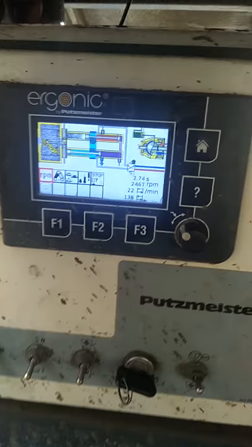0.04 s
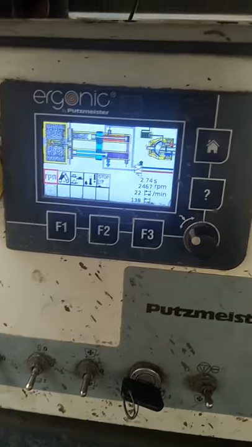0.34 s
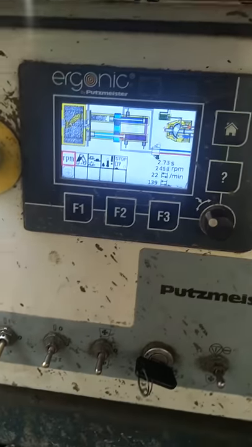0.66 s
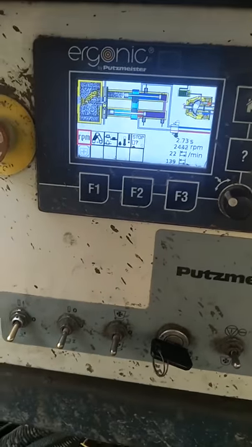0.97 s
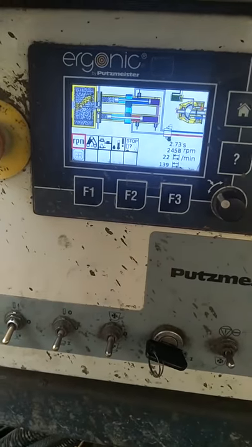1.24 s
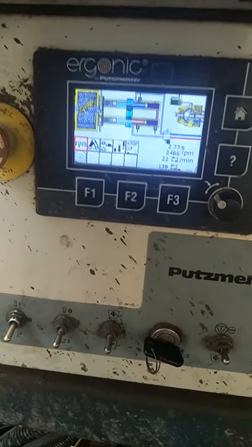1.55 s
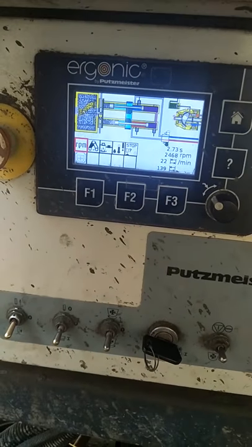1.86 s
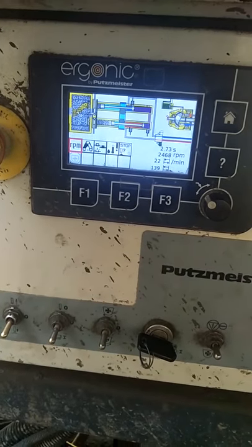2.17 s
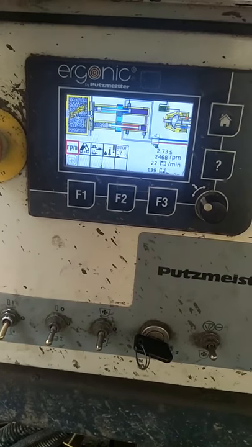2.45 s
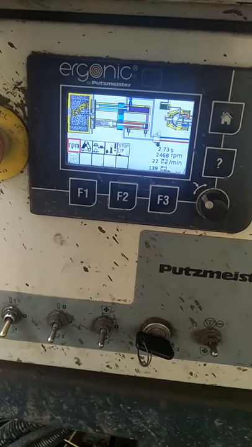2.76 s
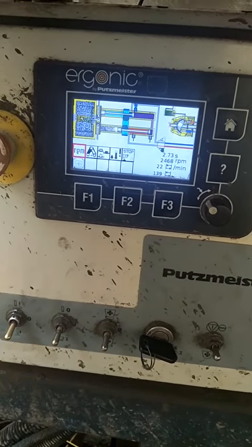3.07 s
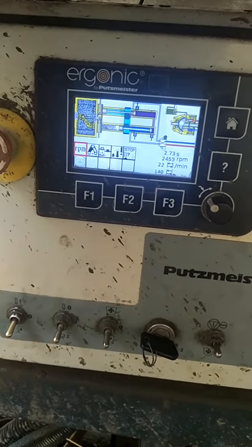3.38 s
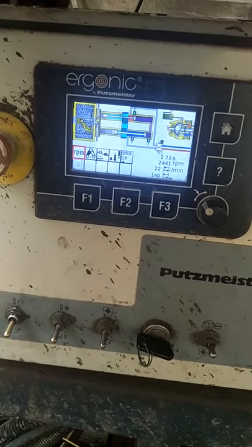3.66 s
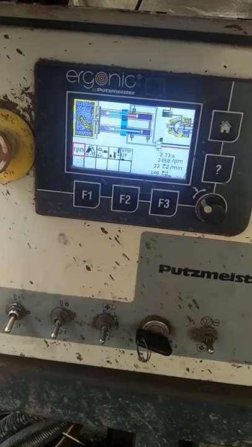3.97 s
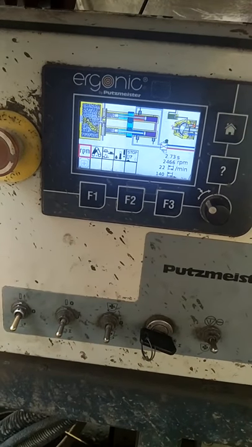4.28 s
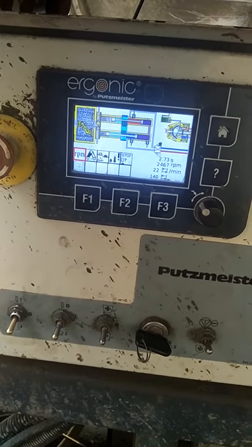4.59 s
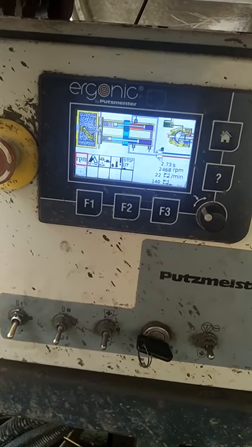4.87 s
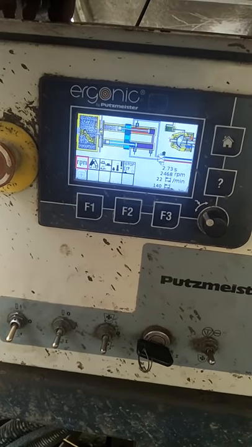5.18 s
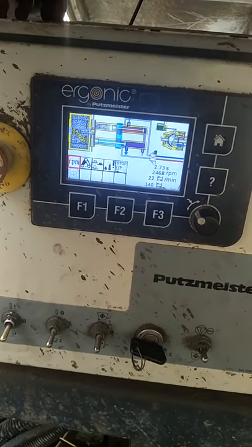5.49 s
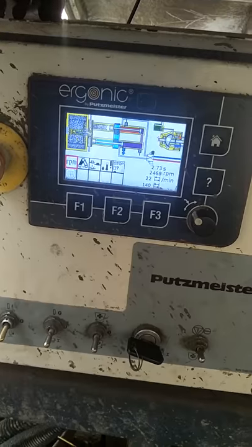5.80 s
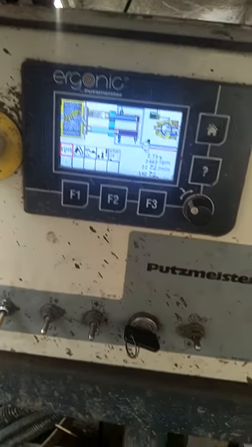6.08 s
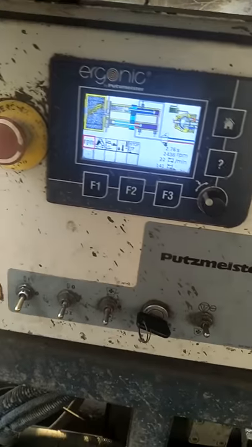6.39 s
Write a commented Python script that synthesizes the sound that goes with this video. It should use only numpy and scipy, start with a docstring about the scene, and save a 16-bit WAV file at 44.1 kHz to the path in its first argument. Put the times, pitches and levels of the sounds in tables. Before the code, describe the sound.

A diesel concrete pump drones loudly with a hydraulic whine, rumbling at each stroke change and twice slamming its valve.

```python
"""Concrete pump, close up

A diesel engine at 2400 rpm drives a nine-piston hydraulic pump and a belt-driven fan. Every 2.7 s the
stroke changes over: the pump whine drops out, the engine sags and recovers, concrete rumbles in the
pipe and oil squirts. The sound fades in during the first changeover. At the next two the valve slams
and the frame knocks, and a gain control ducks after the blows."""
import sys
import numpy as np
from scipy import signal
from scipy.fft import rfft, irfft
from scipy.io import wavfile
from scipy.ndimage import uniform_filter1d, minimum_filter1d

SR = 44100
rng = np.random.default_rng(int(sys.argv[2]) if len(sys.argv) > 2 else 0)


def transcribe(signal):
    """Save signal, clipped to [-1, 1], as a 16-bit WAV file at the path in sys.argv[1]."""
    frames = np.atleast_2d(signal).T
    limited = np.clip(frames, -1, 1)
    pcm = np.round(limited * 32767).astype(np.int16)
    wavfile.write(sys.argv[1], SR, pcm)


N = 292824
TIME_S = np.arange(N) / SR
FREQ_HZ = np.fft.rfftfreq(N, 1 / SR)
CYCLE_HZ = 19.99  # four-stroke cycle, two crank turns


def gain_of(db):
    """Decibels to amplitude."""
    return 10 ** (np.asarray(db) / 20)

def unit_rms(x):
    """Scales to rms 1."""
    return x / np.sqrt(np.mean(x ** 2) + 1e-20)

def spectrum_db(points, hz):
    """Interpolates a spectrum on a log-frequency axis."""
    points_hz, points_db = np.transpose(points)
    return np.interp(np.log(hz + 1), np.log(points_hz), points_db)

def coloured(x, points):
    """Filters x by a spectrum, to rms 1."""
    return unit_rms(irfft(rfft(x) * gain_of(spectrum_db(points, FREQ_HZ)), N))

def wander(rate_hz):
    """Low-passed noise, rms 1."""
    return unit_rms(irfft(rfft(rng.standard_normal(N)) / (1 + (FREQ_HZ / rate_hz) ** 2), N))

def add(mix, start_s, sound):
    """Mixes a sound in, in place."""
    part = mix[round(start_s * SR):][:len(sound)]
    part += sound[:len(part)]

def swell(centre_s, width_s):
    """Gaussian envelope."""
    return np.exp(-((TIME_S - centre_s) / width_s) ** 2)

def tone(cycles, level_db, waver_db):
    """A partial locked to a rotation, wavering in level."""
    amplitude = np.sqrt(2) * gain_of(level_db + waver_db * wander(6.0))
    return amplitude * np.cos(2 * np.pi * (cycles + rng.random()))

def resonance(pitch_hz, width_hz, level_db):
    """A narrow mode, shaken at random."""
    phase = 2 * np.pi * pitch_hz * TIME_S
    return gain_of(level_db) * (wander(width_hz) * np.cos(phase) + wander(width_hz) * np.sin(phase))


# Air noise spectrum: freq_hz, relative_db
AIR_SPECTRUM = [(25, -71), (60, -74), (190, -58), (320, -57), (620, -59), (1000, -56.5), (2100, -56),
                (2900, -62.5), (4800, -68), (6700, -86), (10500, -87.5), (13000, -84), (15000, -92)]

def air_rush(level_db=-21.5, flutter_db=0.5, swell_db=0.07):
    """Cooling air and combustion noise, slightly uneven."""
    strength = gain_of(flutter_db * wander(40) + swell_db * wander(5.5))
    return gain_of(level_db) * coloured(strength * rng.standard_normal(N), AIR_SPECTRUM)


# Fan tones: shaft_harmonic, level_db
FAN_TONES = [(10, -36.5), (11, -37), (12, -41)]

def fan(cycles, turns_per_cycle=3.868):
    """The belt turns the fan out of step with the engine."""
    return sum(tone(round(k) * turns_per_cycle * cycles, db, waver_db=2.5) for k, db in FAN_TONES)


# Stroke changeovers: start_s, length_s, next_cylinder, pressure_db, creep_db_per_s, kick_db,
# rumble_db, squirt_db
CHANGEOVERS = [(0.559, .4, 0, -3, 1.83, 7, -23, -2), (3.29, 0.4, 1, 1.8, -.5, 5, -23, -0.5),
               (6.02, .44, 0, -1.5, 1.5, 10.5, -22, 0)]

def oil_pressure(drop_db=-10.5, drop_s=0.043, return_s=0.065, overshoot_db=1.5, settle_s=0.17):
    """Pressure drops as the valve swings, kicks midway and overshoots; the feed swaps cylinders."""
    load_db, cylinder_mix = np.zeros(N), np.zeros(N)
    for start_s, length_s, cylinder, pressure_db, creep_db_per_s, kick_db, *_ in CHANGEOVERS:
        age_s = TIME_S - start_s
        push_s = np.maximum(age_s - length_s, 0)
        push_db = pressure_db + creep_db_per_s * push_s + overshoot_db * np.exp(-push_s / settle_s)
        swing_db = drop_db + kick_db * swell(start_s + 0.58 * length_s, width_s=0.079)
        load_db += (swing_db - load_db) * np.clip(age_s / drop_s, 0, 1)
        load_db += (push_db - load_db) * np.clip(push_s / return_s, 0, 1)
        cylinder_mix += (round(cylinder) - cylinder_mix) * np.clip(age_s / length_s, 0, 1)
    return load_db, cylinder_mix

def churning(delay_s=0.046, attack_s=0.04, hold_share=0.82, release_s=0.11, rest_db=-46):
    """Envelope of the concrete stirring in the pipe at each changeover."""
    motion = gain_of(rest_db)
    for start_s, length_s, *_, rumble_db, _ in CHANGEOVERS:
        rise = np.clip((TIME_S - start_s - delay_s) / attack_s, 0, 1)
        fall = np.clip(1 - (TIME_S - start_s - hold_share * length_s) / release_s, 0, 1)
        motion = motion + gain_of(rumble_db) * rise * fall
    return motion


# Pipe rumble spectrum: freq_hz, relative_db
RUMBLE_SPECTRUM = [(25, -32), (50, -10), (75, -2), (118, -2), (170, -5), (330, -10), (600, -8),
                   (1100, -11.5), (1800, -9.5), (2600, -10.5), (4000, -33), (8000, -45)]

def concrete_rumble():
    """The mix rumbles in the pipe while the valve swings; hopper and frame ring with it."""
    hopper = resonance(pitch_hz=115.5, width_hz=14, level_db=-7.5)
    frame = resonance(pitch_hz=720, width_hz=11, level_db=-6)
    pipe = coloured(rng.standard_normal(N), RUMBLE_SPECTRUM)
    return churning() * (pipe + hopper + frame)


# Oil valve squirts: changeover_share, level_db, width_s, centre_hz, width_octaves
OIL_VALVES = [(.2, -36, .012, 5300, .25), (.42, -23, 0.017, 1650, .22), (.6, -43.5, 0.084, 4800, 1.0),
              (.74, -44, .03, 12600, .22), (.92, -25, .025, 2400, 0.29)]

def oil_squirts():
    """Oil hisses through the valves in the same order at each changeover, each in its own band."""
    out, noise = np.zeros(N), rfft(rng.standard_normal(N))
    for share, level_db, width_s, centre_hz, width_octaves in OIL_VALVES:
        band = np.exp(-(np.log2((FREQ_HZ + 1) / centre_hz) / width_octaves) ** 2)
        envelope = sum(gain_of(squirt_db) * swell(start_s + share * length_s, width_s)
                       for start_s, length_s, *_, squirt_db in CHANGEOVERS)
        out += gain_of(level_db) * envelope * unit_rms(irfft(noise * band, N))
    return out


def impact_envelope(level_db, t60_s, rise_s=0.001):
    """Quick rise, exponential decay."""
    t = TIME_S[:SR // 2]
    return gain_of(level_db) * (1 - np.exp(-t / rise_s)) * np.exp(-np.log(1000) * t / t60_s)

def struck_mode(pitch_hz, level_db, t60_s):
    """One decaying vibration."""
    return impact_envelope(level_db, t60_s) * np.sin(2 * np.pi * pitch_hz * TIME_S[:SR // 2])


# Knocks: start_s, level_db, hardness_db_per_octave
FRAME_KNOCKS = [(3.374, -16, -3), (3.407, -23.5, -10), (3.584, -24, -7), (6.115, -8, -2),
                (6.307, -6.5, 1.5), (6.318, -12, 3), (6.337, -20, -3)]
# Frame modes: pitch_hz, relative_db, t60_s
FRAME_MODES = [(86.5, -13, 0.22), (133, -2, 0.13), (220, -14, 0.1), (329, -1.5, 0.12), (521, -14.5, 0.11),
               (709, -5, 0.12), (1000, -6, 0.043)]
# Gravel crunch spectrum: freq_hz, relative_db
GRAVEL_SPECTRUM = [(100, -4), (300, 12), (1100, -5), (2500, -24), (6000, -36)]

def knocks(crunch_db=-9, crunch_t60_s=0.086):
    """The new stroke takes up the concrete: gravel crunches, the frame rings, brighter if hit harder."""
    out = np.zeros(N)
    for start_s, level_db, hardness in FRAME_KNOCKS:
        ring = sum(struck_mode(hz, level_db + mode_db + hardness * np.log2(hz / 300), t60_s)
                   for hz, mode_db, t60_s in FRAME_MODES)
        gravel = coloured(rng.standard_normal(N), GRAVEL_SPECTRUM)[:len(ring)]
        crunch = impact_envelope(level_db + crunch_db + 2 * hardness, crunch_t60_s) * gravel
        add(out, start_s, ring + crunch)
    return out


# Valve impacts: start_s, level_db, pitch_hz, t60_s
VALVE_SLAMS = [(3.271, 1.5, 291, 0.088), (3.281, -5.5, 357, .08), (3.294, 2, 276, 0.15),
               (5.998, -4, 330, 0.076), (6.003, -1.5, 280, 0.18), (6.021, -4, 319, 0.17),
               (6.042, -8, 268.8, .1)]
# Pipe modes: pitch_ratio, relative_db
PIPE_MODES = [(1, -2), (1.28, -12), (2.02, -13.5), (3.2, -22)]

def valve_slams():
    """The valve slams over and rings the pipe."""
    out = np.zeros(N)
    for start_s, level_db, pitch_hz, t60_s in VALVE_SLAMS:
        ring = sum(struck_mode(pitch_hz * ratio, level_db + db, t60_s) for ratio, db in PIPE_MODES)
        add(out, start_s, ring)
    return out


# Governor response: changeover_share, offset_hz
SPEED_SAG = [(0, 0), (.25, -.74), (.55, -.41), (.77, -.34), (.99, .26), (1.24, -.05), (1.5, 0)]

def crank(jitter_cycles=0.00038, shudder_cycles=0.019):
    """Engine cycles elapsed; at each changeover the crank shudders, sags and overshoots."""
    offset_hz = sum(np.interp((TIME_S - start_s) / length_s, *np.transpose(SPEED_SAG))
                    for start_s, length_s, *_ in CHANGEOVERS)
    unevenness = (jitter_cycles + shudder_cycles * churning()) * wander(13.5)
    return np.cumsum(CYCLE_HZ + offset_hz) / SR + unevenness


# Engine band edges, the lowest two bands being exhaust: edge_hz
BAND_EDGES_HZ = [0, 150, 550, 1100, 1900, 6000]

def spread_power(lines, hz, bursts):
    """Reshapes one cycle's spectrum: exhaust comes in bursts, block clatter falls evenly all round."""
    cycle = 0
    for low_hz, high_hz in zip(BAND_EDGES_HZ, BAND_EDGES_HZ[1:]):
        band = irfft(lines * (hz >= low_hz) * (hz < high_hz))
        power = uniform_filter1d(band ** 2, len(band) // 8, mode="wrap")
        levelled = band * np.sqrt(power.mean() / power)
        cycle = cycle + levelled * (bursts if high_hz <= BAND_EDGES_HZ[2] else 1)
    return rfft(cycle)


# Exhaust drone: cycle_harmonic, level_db
EXHAUST_LINES = [(2, -51), (3, -38), (4, -43), (5, -48), (6, -40), (7, -41), (8, -41), (9, -36), (10, -32),
                 (11, -29), (12, -39), (13, -34), (14, -35), (15, -35), (16, -36), (17, -39), (19, -36),
                 (20, -38), (21, -51), (22, -31), (23, -49), (24, -37), (25, -47), (26, -36), (27, -37),
                 (28, -39)]
# Strongest engine block lines: cycle_harmonic, level_db
BLOCK_LINES = [(42, -34), (46, -37), (48, -32), (49, -36), (52, -38), (58, -32), (59, -36), (60, -37),
               (62, -36), (63, -32), (65, -35), (66, -30), (69, -33), (73, -31), (75, -36), (76, -37),
               (77, -37), (78, -32), (81, -34), (84, -36), (87, -33), (89, -32), (92, -34), (93, -35),
               (100, -38), (104, -37), (105, -35), (109, -38)]
# Envelope of the other block lines: freq_hz, line_db
CLATTER_SPECTRUM = [(600, -46.5), (850, -41), (1200, -41.5), (1700, -42), (2100, -44.5), (2500, -45.5),
                    (3200, -53), (4500, -69), (5500, -70.5)]

def diesel_engine(cycles, cylinders=3, scatter_db=4.0, burst_floor=0.97, decay_share=0.28, size=8192):
    """One cycle repeats with the crank: low exhaust bursts under the dense clatter of the block."""
    position, harmonic = np.arange(size) / size, np.arange(size // 2 + 1)
    hz = harmonic * CYCLE_HZ
    line_db = spectrum_db(CLATTER_SPECTRUM, hz) + scatter_db * rng.standard_normal(len(hz))
    for k, level_db in [*EXHAUST_LINES, *BLOCK_LINES]:
        line_db[round(k)] = level_db
    sounding = (harmonic > 1) & (harmonic < 300) & (harmonic % 18 > 0)  # every 18th is the pump's
    amplitudes = gain_of(line_db) * sounding
    bursts = burst_floor + np.exp(-(position * cylinders % 1) / decay_share)
    lines = amplitudes * np.exp(2j * np.pi * rng.random(len(hz)))
    for _ in range(12):  # phases settle into the firing pattern
        lines = amplitudes * np.exp(1j * np.angle(spread_power(lines, hz, bursts)))
    return np.interp(cycles, position, irfft(lines) * size / np.sqrt(2), period=1)


# Pump whine: piston_harmonic, first_cylinder_db, second_cylinder_db, waver_db
WHINE_TONES = [(1, -33.5, -33, 0.5), (2, -32, -32, 1.9), (3, -34, -28, 1.4), (4, -32.5, -33, 0),
               (5, -31.5, -35, 3), (6, -26.5, -26, 1.14), (7, -40, -41, 2), (8, -40, -38.5, 2),
               (9, -41.5, -41.5, 2)]
# Oil line surges: centre_s, level_db, width_s, piston_harmonic
LINE_SURGES = [(0.987, -27.5, 0.044, 2), (3.8, -35.5, 0.17, 1), (6.503, -26, 0.055, 2)]

def hydraulic_pump(cycles, pistons=9):
    """Piston whine follows oil pressure and the cylinder fed; the lines drone as pressure swings."""
    pulses = 2 * pistons * cycles
    load_db, cylinder_mix = oil_pressure()
    whine = sum(tone(round(k) * pulses, load_db + first_db + (second_db - first_db) * cylinder_mix, waver)
                for k, first_db, second_db, waver in WHINE_TONES)
    drone = sum(swell(centre_s, width_s) * tone(round(k) * pulses, level_db, waver_db=4.5)
                for centre_s, level_db, width_s, k in LINE_SURGES)
    return whine + drone


def scene(low_cut_hz=75):
    """Mono mix; engine, pump and fan follow one crank."""
    cycles = crank()
    cover = resonance(pitch_hz=445, width_hz=5.2, level_db=-36)
    turbo = resonance(pitch_hz=13050, width_hz=50, level_db=-61)
    machine = diesel_engine(cycles) + hydraulic_pump(cycles) + fan(cycles) + air_rush() + cover + turbo
    rumble = concrete_rumble()
    low_cut = signal.butter(3, low_cut_hz, "highpass", fs=SR, output="sos")
    blows = signal.sosfilt(low_cut, valve_slams() + knocks())
    return (machine + rumble + blows + oil_squirts())[None]


# Overall level drift: time_s, gain_db
LEVEL_DRIFT = [(1, -0.6), (2.2, 0), (3.2, -0.57), (3.8, -1.5), (4.3, -0.37), (5.8, 0.3)]

def fade_in(start_s=0.583, from_db=-27, rise_s=0.21):
    """The gain opens quickly from silence, then drifts."""
    opening = 1 - (1 - gain_of(from_db)) * np.exp(-np.maximum(TIME_S - start_s, 0) / rise_s)
    drift = gain_of(np.interp(TIME_S, *np.transpose(LEVEL_DRIFT)))
    return (TIME_S > start_s) * opening * drift

def record(dry, threshold_db=-13.0, duck_slope=1.245, hold_s=0.037, settle_s=0.01, ceiling=0.67):
    """Fade-in, gain control that ducks after the blows, peak limiter, low-pass."""
    window = np.clip(hold_s * SR - np.arange(SR // 4), 0, 1)
    power = signal.oaconvolve(dry[0] ** 2, window / window.sum())[:N]
    over_db = np.maximum(10 * np.log10(abs(power) + 1e-12) - threshold_db, 0)
    pole = np.exp(-1 / (settle_s * SR))
    duck_db = duck_slope * signal.lfilter([1 - pole], [1, -pole], over_db)
    ducked = dry * fade_in() * gain_of(-duck_db)
    allowed_gain = ceiling / np.maximum(abs(ducked), ceiling)
    limited = ducked * uniform_filter1d(minimum_filter1d(allowed_gain, size=200), size=200)
    low_pass = signal.firwin(1023, cutoff=15720, window=("kaiser", 9), fs=SR)
    return signal.oaconvolve(limited, low_pass[None], "same")


dry = scene()
out = record(dry)
transcribe(out)
```